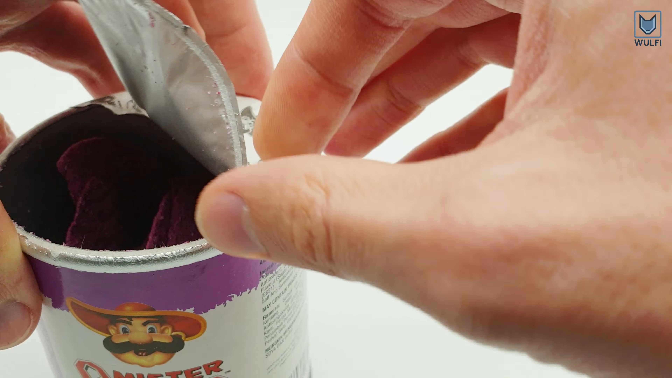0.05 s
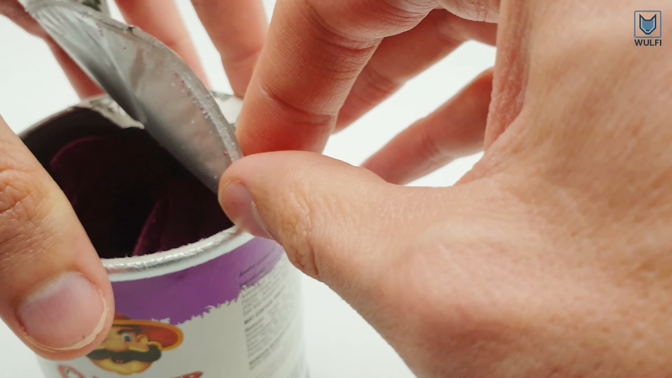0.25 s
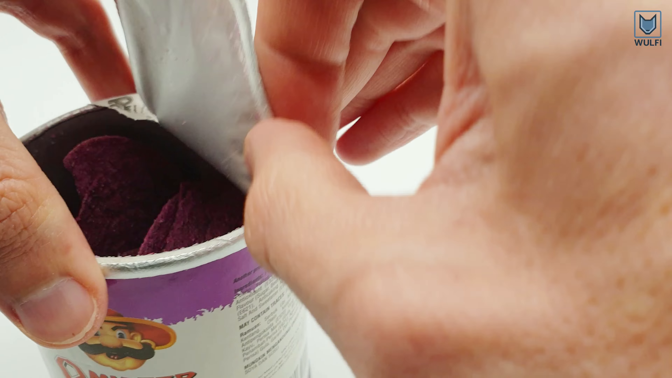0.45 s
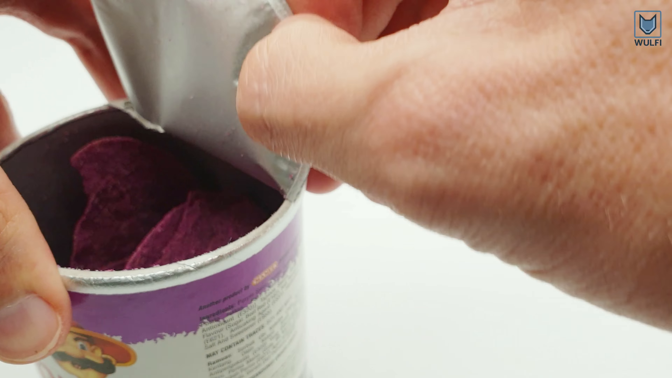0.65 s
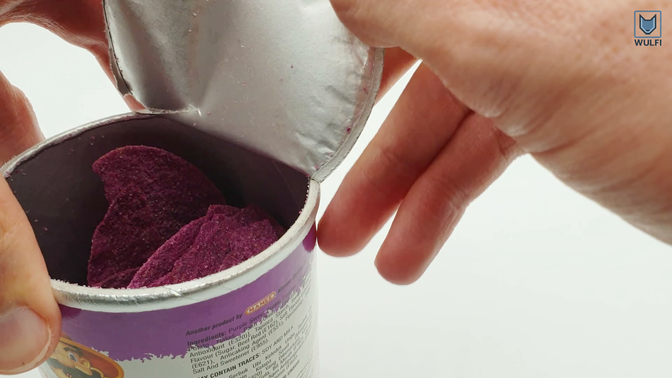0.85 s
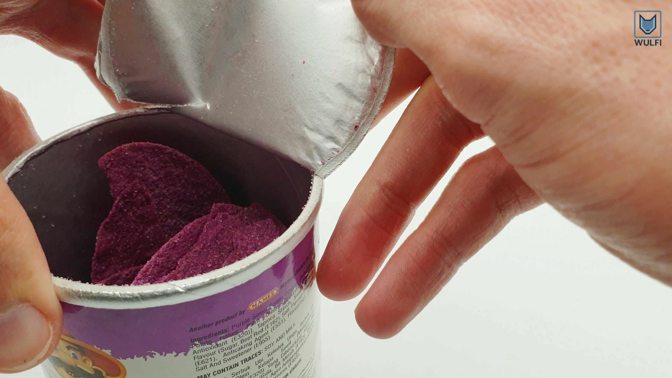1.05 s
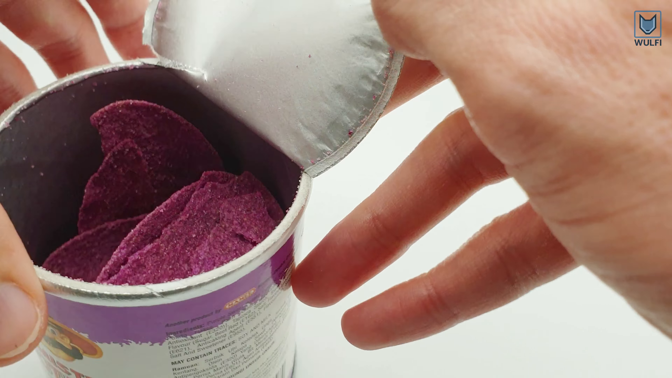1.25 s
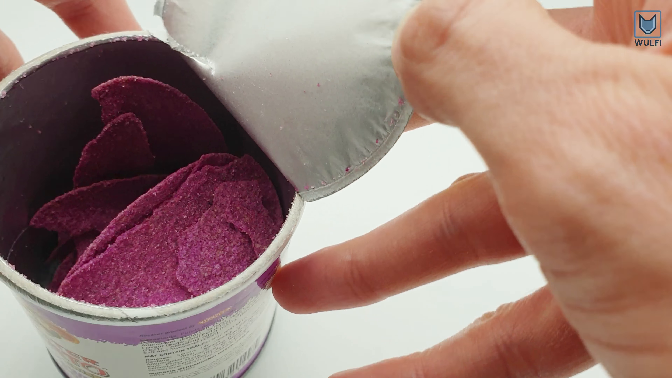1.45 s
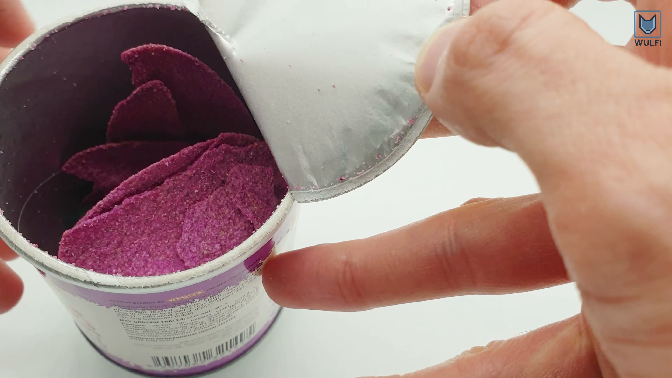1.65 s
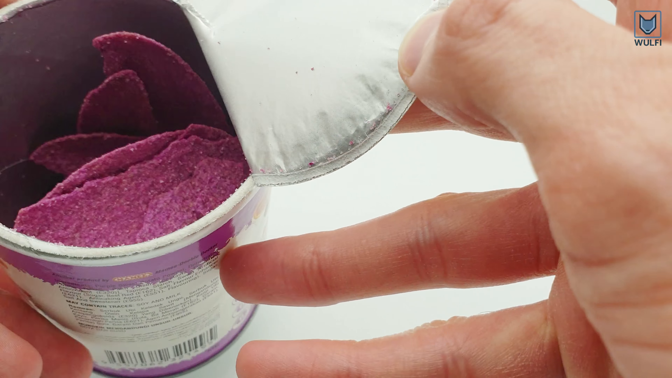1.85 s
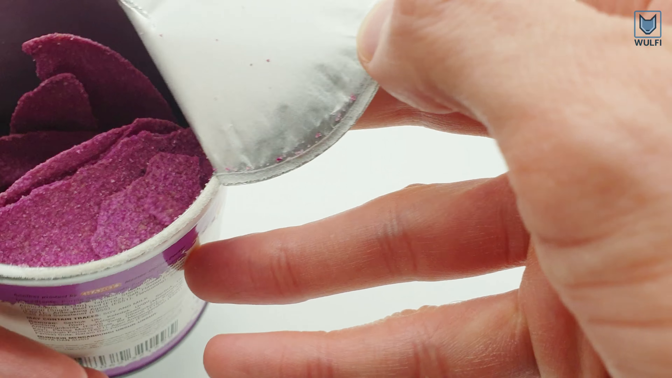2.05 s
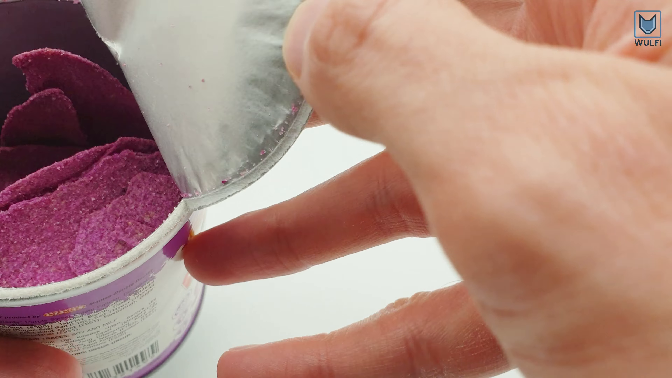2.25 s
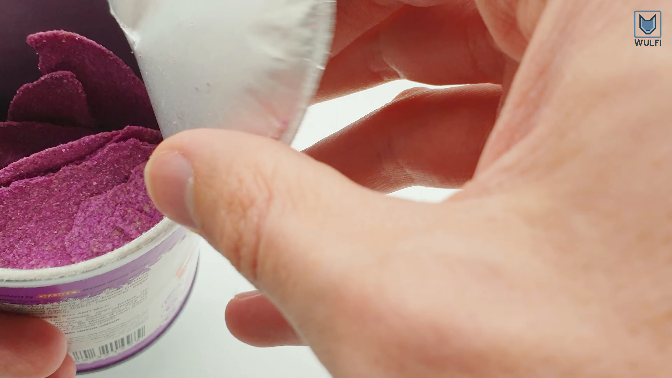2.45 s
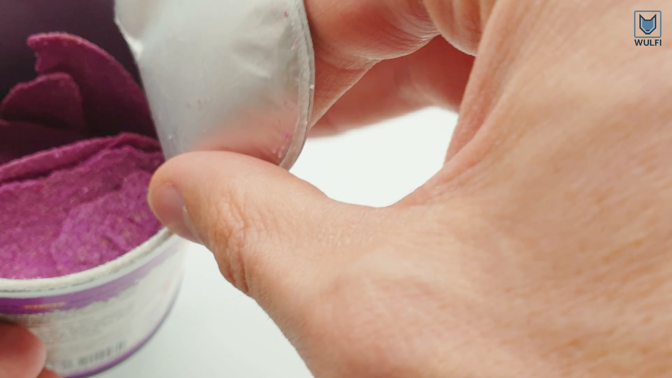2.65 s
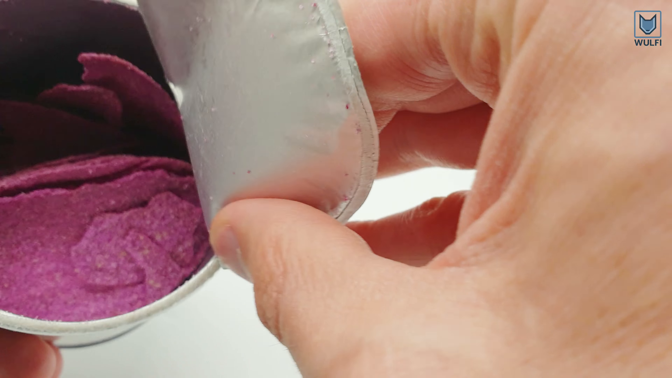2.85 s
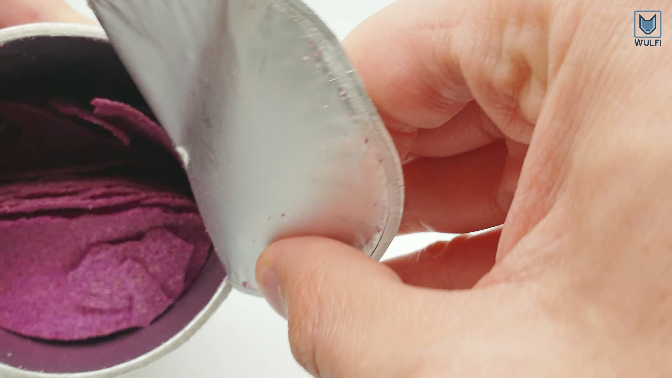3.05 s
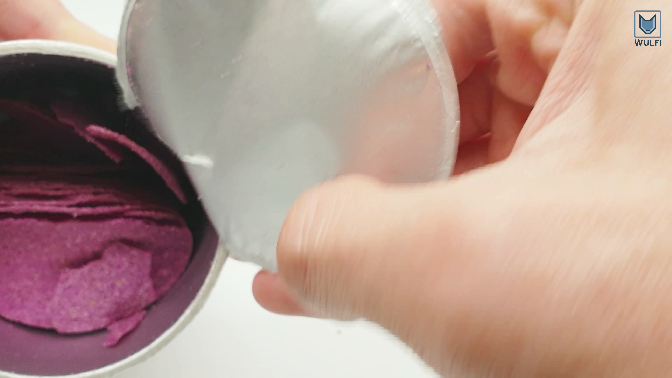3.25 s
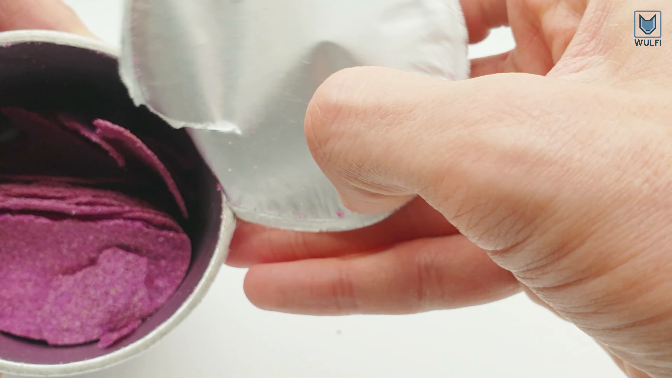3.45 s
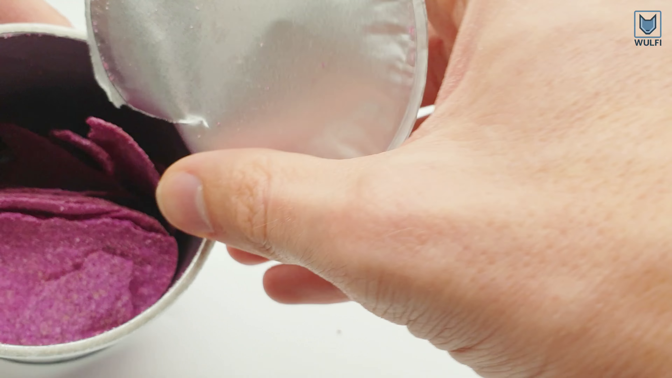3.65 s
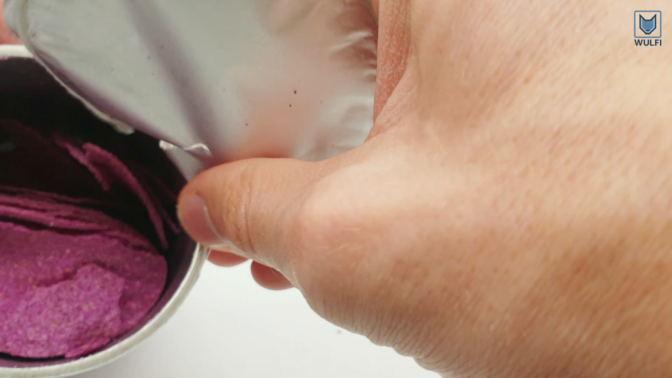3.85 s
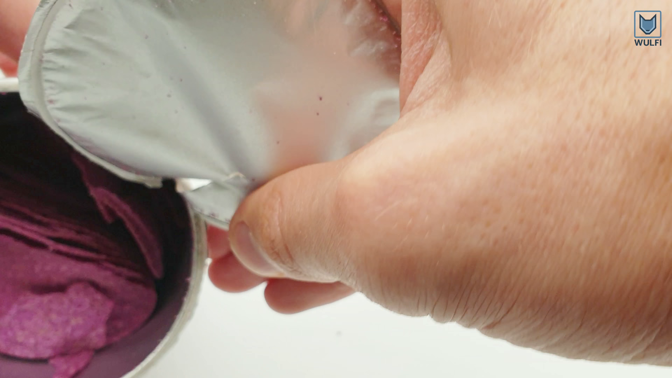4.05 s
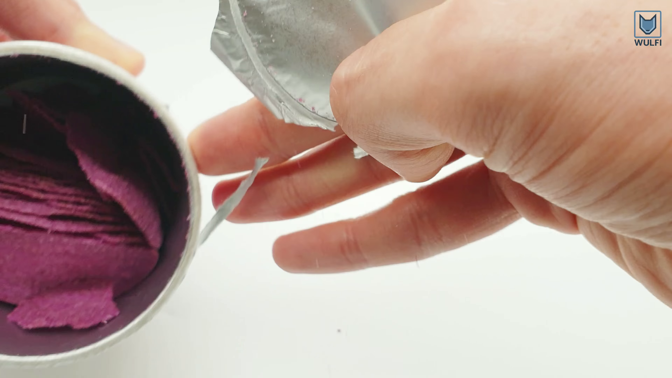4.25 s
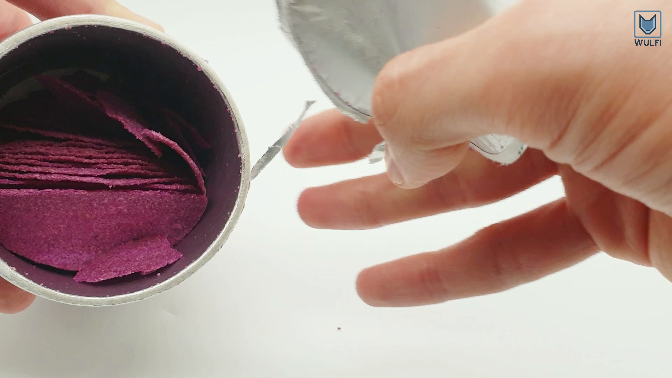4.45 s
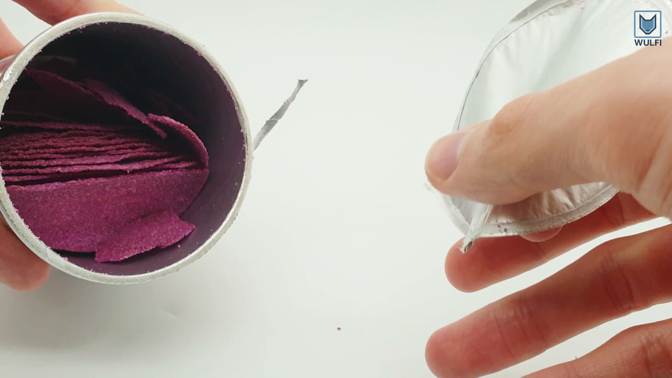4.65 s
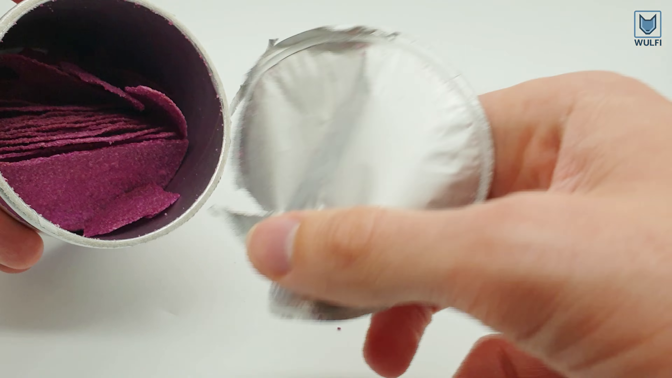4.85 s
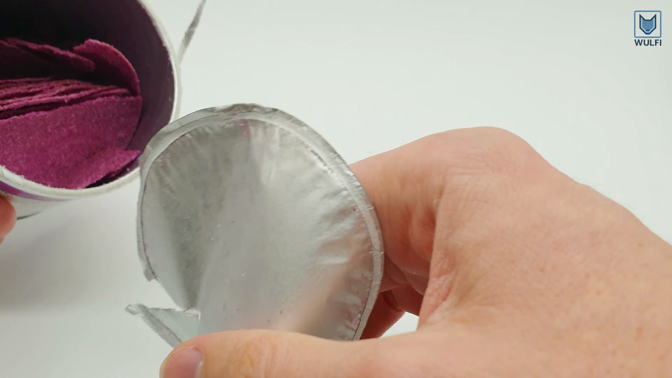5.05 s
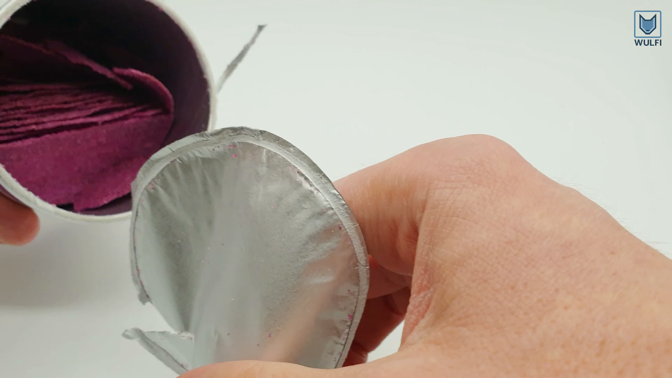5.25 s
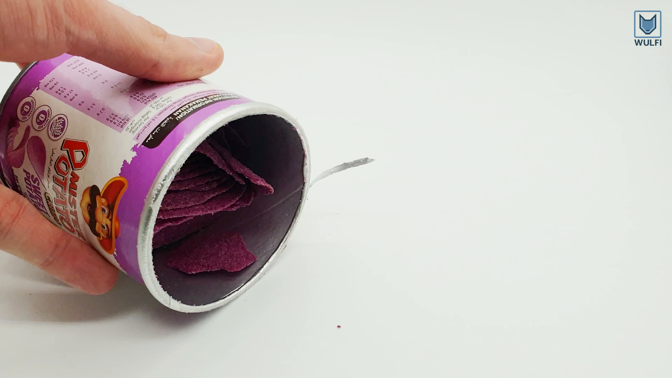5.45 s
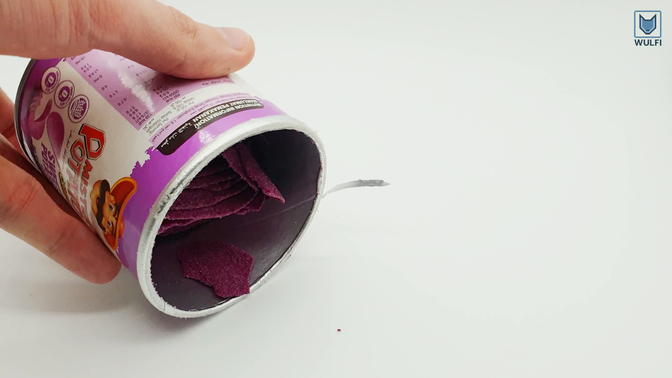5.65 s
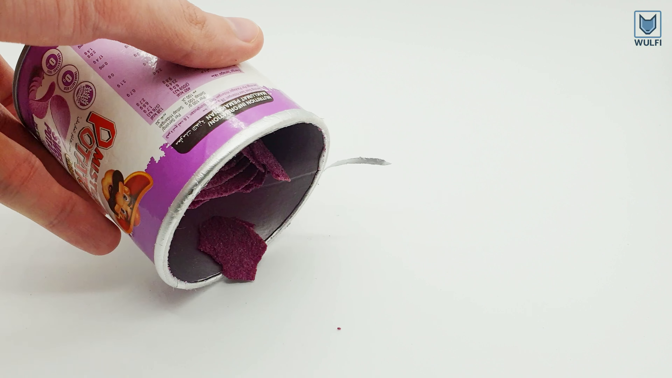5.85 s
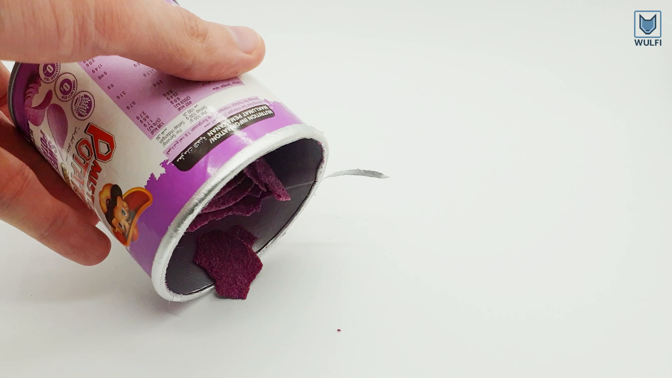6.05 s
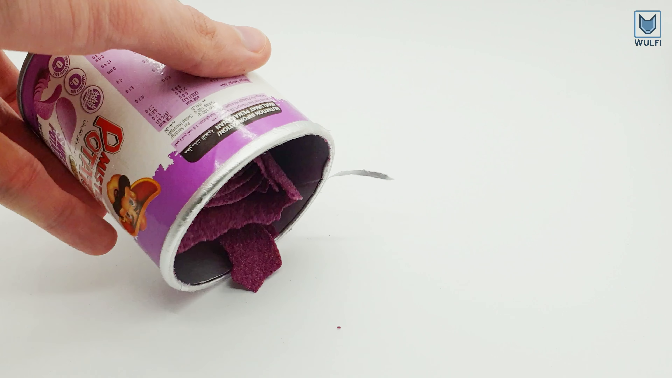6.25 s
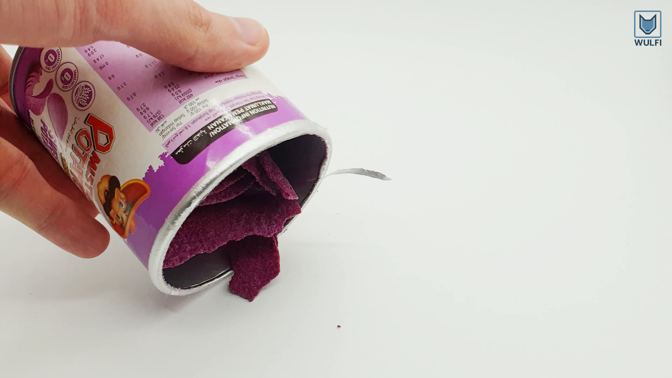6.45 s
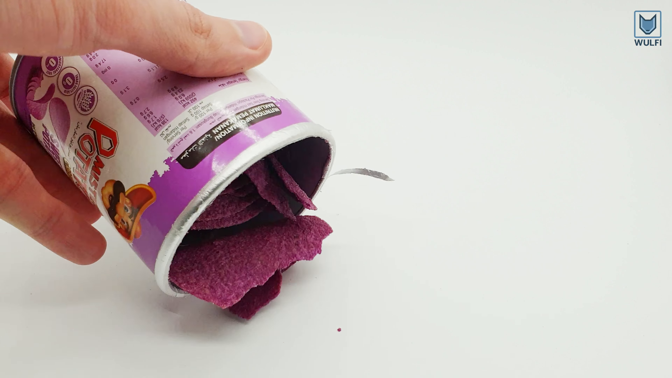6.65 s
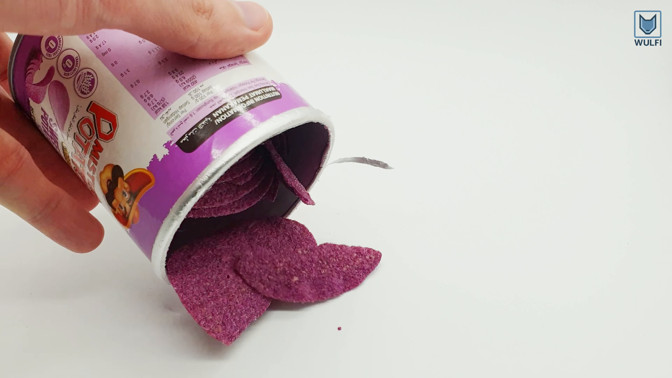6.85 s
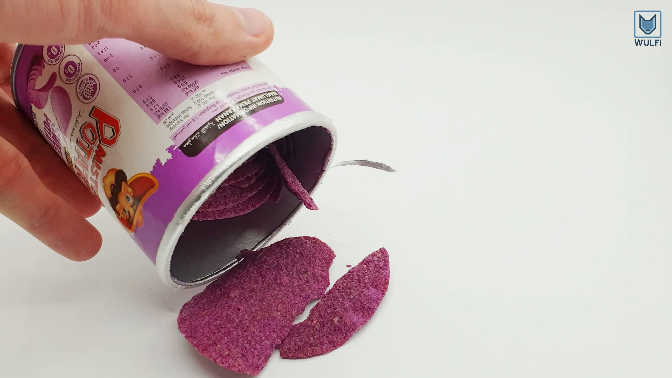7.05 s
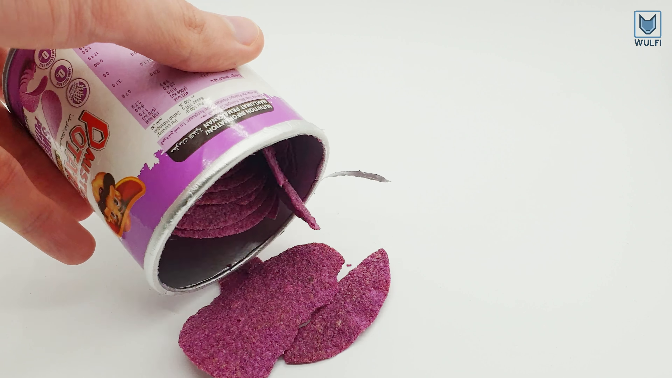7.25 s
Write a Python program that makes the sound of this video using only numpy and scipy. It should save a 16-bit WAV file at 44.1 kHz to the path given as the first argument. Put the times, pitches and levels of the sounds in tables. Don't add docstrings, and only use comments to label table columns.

```python
import sys
import numpy as np
from scipy import signal
from scipy.fft import rfft, irfft, next_fast_len
from scipy.io import wavfile
from scipy.ndimage import uniform_filter1d, map_coordinates

SR = 44100
rng = np.random.default_rng(int(sys.argv[2]) if len(sys.argv) > 2 else 0)


def file_out(sig):
    cols = np.atleast_2d(sig).T
    lim = np.clip(cols, -1, 1)
    pcm = np.round(lim * 32767).astype(np.int16)
    wavfile.write(sys.argv[1], SR, pcm)


def invert_db(level):
    return 10 ** (np.asarray(level, dtype=float) / 20)


N = 322371

# t/s, length/s, first level/dB
FLEXES = [
    (4.536, 0.071, -51),
    (4.657, 0.075, -49.5),
    (4.778, 0.043, -64),
    (4.834, 0.035, -56.5),
]
# t/s, peak/dB, f/Hz
CRACKS = [(0.5476, -17, 8600), (0.6744, -24, 5730), (0.6873, -9, 8640), (0.7472, -21, 8150),
          (0.7951, -8, 4870), (0.842, -9, 4320), (0.9686, -17.5, 1820), (1.2795, -4.5, 6150),
          (1.329, -34, 1780), (1.8462, -45, 2760), (2.134, -36, 1510), (2.178, -25, 2150),
          (2.3007, -38, 1760), (2.3245, -33, 2030), (2.361, -40, 4140), (2.384, -32, 2920),
          (2.4078, -27.5, 1610), (2.5312, -38, 1770), (2.5596, -39, 1880), (2.579, -37, 1940),
          (2.6334, -26, 8120), (2.7287, -42, 9170), (2.8298, -34, 2020), (2.9362, -14, 8770),
          (3.074, -10, 7880), (3.1552, -40, 6920), (3.1985, -33.5, 2330), (3.2271, -16, 8040),
          (3.3551, -13.5, 2890), (3.3704, -11, 8050), (3.487, -24, 5120), (3.5017, -22, 6390),
          (3.5633, -18, 3500), (3.711, -30.5, 6000), (3.7683, -31.5, 8330), (3.8452, -27, 4260),
          (3.9505, -8, 8190), (4.0633, -14.5, 9210), (4.076, -11, 8890), (4.1809, -32.5, 8500),
          (4.2363, -2.5, 4410), (4.3776, -26, 1550), (4.3944, -31, 7920), (4.4162, -23, 3140)]
# t/s, peak/dB, f/Hz
CLICKS = [(5.4076, -40, 3620), (5.4413, -13.5, 4000), (5.4789, -23.5, 3950), (5.498, -24, 8630),
          (5.5253, -27, 7710), (5.5954, -37, 3780), (5.6111, -35, 11300), (5.6236, -28, 4970),
          (5.6914, -38, 7640), (5.8301, -36, 8210), (5.9594, -37, 5060), (6.0462, -42, 3830),
          (6.1489, -37, 4230), (6.2134, -27, 7730), (6.27, -26, 11400), (6.384, -30, 3500),
          (6.4074, -24, 5060), (6.5594, -35, 8230), (6.6364, -29, 4850), (6.6516, -14, 9210),
          (6.6762, -15, 3950), (6.6762, -12, 4070), (6.693, -8, 3830), (6.8244, -26, 5120),
          (6.8788, -24, 5080), (6.9002, -26, 10300), (6.9054, -29, 3900), (6.9366, -20.5, 4260),
          (6.9681, -17.5, 3850), (7.0459, -38, 4140), (7.1003, -14.5, 4220), (7.211, -34, 3590),
          (7.2394, -33, 4020), (7.289, -31, 11000)]
FLEX_DB = 1
LOUD_DB = -40
CLICK_DELAY_S = .0009
TICK_S, TICK_DB = 0.013, -16


def unit(x):
    return x / np.sqrt(np.mean(x ** 2) + 1e-20)


def along(points, hz):
    f, v = np.transpose(points)
    return np.interp(np.log(hz + 1), np.log(f + 1), v)


def curves(rows):
    s, *cols = np.transpose(rows)
    t = np.arange(N) / SR
    return np.array([np.interp(t, s, c, left=-150, right=-150) for c in cols])


def wobble(rate):
    return map_coordinates(rng.standard_normal(int(N * rate / SR) + 4), [np.arange(N) * rate / SR])


def filtered(x, response):
    m = 2 * next_fast_len(N // 2 + 4096)
    gain = response(np.fft.rfftfreq(m, 1 / SR))
    gain = gain / np.sqrt(np.mean(np.abs(gain) ** 2))
    return irfft(rfft(x, m) * gain, m)[..., :N]


def resonant(modes):
    def response(f):
        power = sum(np.abs(invert_db(db) * f * w / (c * c - f * f + 1j * f * w)) ** 2 for c, w, db in modes)
        cepstrum = irfft(np.log(power + 1e-9) / 2)
        half = len(cepstrum) // 2
        folded = np.r_[cepstrum[0], 2 * cepstrum[1:half], np.zeros(len(cepstrum) - half)]
        return np.exp(rfft(folded))
    return response


def quiet():
    # f/Hz, level/dB per Hz
    floor = [(22, -7), (107, -6), (281, -20), (450, -34.5), (2600, -40), (8480, -35), (14800, -38),
             (16500, -51.5)]
    # f/Hz, correlation/1
    likeness = [(60, 1), (380, 0.54), (2380, -0.01), (15000, 0.34)]
    hum_db, sway_db = -63.5, 2

    def mid_side(hz):
        turn = np.arccos(np.clip(along(likeness, hz), -1, 1)) / 2
        return invert_db(along(floor, hz)) * [np.cos(turn), np.sin(turn)]

    mid, side = filtered(rng.standard_normal((2, N)), mid_side)
    air = invert_db(-64.0 + sway_db * wobble(5.5)) * unit(np.array([mid + side, mid - side]))
    phase = 2 * np.pi * np.cumsum(99.3 + 1.6 * wobble(15.0)) / SR
    hum = np.sqrt(2) * invert_db(hum_db + 3.1 * wobble(18)) * np.sin(phase)
    return air + hum * invert_db([[-.8], [.8]])


def grit(alike, grain_db, lag):
    cracks = rng.standard_normal((2, N))
    place = np.repeat(rng.standard_normal(N // 1500 + 1), 1500)[:N]
    late = np.clip(np.arange(N) + np.round(lag * place).astype(int), 0, N - 1)
    right = alike * cracks[0, late] + np.sqrt(1 - min(alike, 1) ** 2) * cracks[1]
    clumps = invert_db(grain_db * (wobble(700) + 0.62 * wobble(150)))
    return unit(clumps * np.array([cracks[0], right]))


def patchy(x, depth_db):
    z = signal.stft(x, nperseg=256)[2]
    field = uniform_filter1d(rng.standard_normal(z.shape[1:]), size=2, axis=0)
    field = uniform_filter1d(field, size=9, axis=1)
    patched = signal.istft(z * invert_db(depth_db * unit(field)), nperseg=256)[1][:, :N]
    return patched * invert_db(-depth_db ** 2 / 13.0)


def bursts(strokes, rise_s, stop_s, spread_db):
    bend = 0.91
    env = np.zeros((3, 2, N + SR))
    pans_db = spread_db * rng.standard_normal((len(strokes), 1))
    for (s, length, db, change_db, mid_db, tube_db), pan_db in zip(strokes, pans_db):
        t = np.arange(round((length + 2 * stop_s) * SR)) / SR
        slope_db = change_db * np.minimum(t / length, 1) ** (bend if change_db < 0 else 1)
        slope_db = slope_db - 60 * np.maximum(t - length, 0) / stop_s
        front = 1 + 0.37 * (change_db < 0) * np.exp(-t / 0.00049)
        shape = (1 - np.exp(-t / rise_s)) * front * invert_db(slope_db)
        layers = invert_db(db + np.array([0, mid_db, tube_db]))[:, None] * invert_db(pan_db * [1, -1])
        start = round(s * SR)
        env[:, :, start:start + len(t)] += (layers[..., None] * shape) ** 2
    return env[..., :N]


def chatter(rate, depth_db, life_s):
    breaks = (rng.random(N) < rate / SR) * invert_db(depth_db * rng.standard_normal(N))
    flare = np.exp(-np.arange(SR // 20) / SR / life_s)
    gain = 1 + signal.fftconvolve(breaks, flare)[:N] * invert_db(depth_db)
    return np.abs(gain) / np.mean(gain)


def crackle(cracks, bed, env, hiss, sheet, air, burst_db, thump_db, tube_pan_db, mouth_hz):
    # f/Hz, width/Hz, level/dB
    rumble = [(58.5, 70, 1), (192, 36, 3), (277, 84, -4)]
    fine, coarse, dull = cracks
    bed = invert_db(curves(bed) + np.array([[1.8], [3], [3.4], [3.4]]) * wobble(25))
    drive = np.sqrt(bed[:3, None] ** 2 + env * invert_db(np.array(burst_db))[:, None, None] ** 2)

    def tube(f):
        mouth = (1j * f / (mouth_hz + 1j * f)) ** 2
        return resonant(air)(f) * mouth

    bright = filtered(drive[0] * fine, lambda f: invert_db(along(hiss, f)))
    middle = filtered(drive[1] * np.roll(fine, SR // 60, axis=1), resonant(sheet))
    hollow = filtered(drive[2] * coarse, tube) * invert_db([[tube_pan_db], [-tube_pan_db]])
    shove = np.sqrt(bed[3] ** 2 + env[2] * invert_db(thump_db) ** 2)
    return bright + middle + hollow + filtered(shove * dull, resonant(rumble))


def foil(cracks):
    # t/s, length/s, last level/dB, tube re hiss/dB
    creaks = [(0.0, 0.043, -45.5, 8.5), (.174, 0.022, -39.5, 4), (.89, 0.02, -28, -4),
              (1.233, 0.053, -35, 0), (2.115, 0.054, -43, -3.5), (2.383, 0.019, -42.5, 0.5),
              (2.506, 0.03, -51, -19), (2.68, 0.05, -53, -28), (2.812, 0.025, -43.5, -9),
              (3.751, 0.015, -43, -6), (3.825, 0.027, -35.5, -2), (4.157, 0.07, -46.5, -10)]
    # t/s, length/s, level/dB, tube re hiss/dB
    rips = [
        (.545, 0.082, -33, -6),
        (.668, .05, -34, -8),
        (1.012, 0.21, -50, 1.5),
        (2.54, 0.125, -55, -8),
        (2.935, 0.087, -35, -18.5),
    ]
    # t/s, length/s, first level/dB, tube re hiss/dB
    tears = [(.194, 0.048, -50, 4), (.421, 0.098, -53.5, 5), (.631, 0.053, -39.5, -20),
             (.674, 0.065, -33, -6), (.774, 0.027, -25.5, -12), (.836, 0.084, -31.5, -8.5),
             (1.299, 0.057, -59, 11.5), (2.201, 0.096, -52, -3.5), (3.021, .05, -39, -16),
             (3.121, 0.19, -53, 2), (3.209, 0.039, -31, -12.5), (3.227, 0.027, -26.5, -9),
             (3.34, 0.011, -32, -12), (3.355, 0.01, -18, -11.5), (3.55, .012, -48, -6),
             (3.404, 0.059, -47.5, 3.5), (3.528, 0.027, -64, 13.5), (3.563, 0.058, -35.5, -5.5),
             (3.767, 0.048, -40, -11), (3.891, 0.023, -44, -7), (3.933, 0.014, -34, -9),
             (4.065, 0.007, -29.5, -8), (4.105, .012, -30.5, -4), (4.258, 0.02, -25.5, 3.5)]
    # t/s, length/s, first level/dB, tube re hiss/dB
    snaps = [(.042, 0.029, -36, -3.5), (.216, 0.059, -40.5, -1), (.402, 0.023, -26.5, -7.5),
             (.746, 0.046, -29.5, -15), (.794, 0.073, -22.5, -6), (.91, 0.067, -23, -3),
             (.968, 0.019, -23.5, -22), (1.279, 0.0074, -20.5, -8), (2.177, 0.03, -35, -23),
             (2.321, 0.1, -46.5, -8), (2.408, 0.085, -45, 0), (2.634, 0.085, -42, -5),
             (2.836, 0.26, -50.5, -4.5), (3.073, 0.053, -35, -17), (3.259, 0.056, -31.5, -10.5),
             (3.304, 0.027, -33.5, -9), (3.326, 0.03, -31, -10), (3.37, 0.028, -17, -16),
             (3.486, 0.026, -29, -6.5), (3.504, 0.012, -17.5, -18), (3.622, 0.043, -29.5, -2),
             (3.728, 0.021, -31.5, -6), (3.849, 0.036, -31.5, -6), (3.921, 0.025, -35, -21.5),
             (3.949, 0.042, -14.5, -13.5), (4.077, 0.048, -19.5, -13.5), (4.119, 0.039, -28, -29),
             (4.235, 0.041, -12.5, -1.5), (4.276, 0.063, -19.5, -8), (4.378, 0.042, -34, -8.5),
             (4.394, 0.043, -34.5, -11.5), (4.412, 0.088, -40, -10.5), (.687, .03, -29, -13),
             (1.3263, 0.012, -43, 5)]
    # t/s, peak/dB, sheet re peak/dB, tube re peak/dB
    lone_ticks = [(0.3593, -42.5, 3, -2), (.379, -36.5, -3, -5), (1.184, -37, -5, -9),
                  (1.726, -56, 13.5, -20), (1.75, -57, 13.5, -22), (1.785, -52, 10.5, -18),
                  (1.87, -45, 7.5, 4), (2.244, -46.5, 2, 14), (2.301, -50.5, 9, 12), (2.428, -42, 10, 13),
                  (2.464, -46, 0, 0), (2.533, -41, -3, 7.5), (2.562, -49, -5, 7), (2.579, -38, -4, 5),
                  (2.618, -33.5, -7, -13), (2.66, -43.5, 7, 8), (2.7292, -35, -20, -26)]
    # t/s, effort/dB
    handling = [(0, -65.5), (.3, -63.5), (.8, -51), (1.36, -53.5), (1.4, -64.5), (1.62, -80), (1.8, -70),
                (2.02, -75.5), (2.6, -65), (2.8, -72.5), (3.65, -62), (4.5, -57.5), (4.53, -71.5),
                (4.62, -62), (4.72, -63), (4.77, -80), (5.0, -84), (5.2, -105), (5.42, -90)]
    # f/Hz, level/dB per Hz
    glue_hiss = [(2530, -19), (4300, -2), (6300, -4.5), (8700, -1.5), (12100, -2.5), (14900, -10.5),
                 (15900, -10), (16500, -45.5)]
    # f/Hz, width/Hz, level/dB
    foil_modes = [(1090, 260, -6.5), (1755, 430, -2.5), (2467, 480, -2), (2980, 250, -1), (3480, 890, -2),
                  (4350, 140, -1.5)]
    # f/Hz, width/Hz, level/dB
    upright_air = [(419.6, 160, -0.5), (611, 66, 3), (698, 35, -8.5)]
    creak_db, rip_db, tear_db, snap_db = 13.5, 1, -8, -23
    sheet_db, sheet_thins = -4, 0.077
    rip_sheet_db = -5
    loose_sheet_db, loose_tube_db = -16, -36
    effort_db = -66
    # level at that effort, dB per dB of effort
    rub_db, rub_grows = [-60.5, -66.5, -71, -73], [0.19, 0.68, 1.2, 0.86]
    hush_s, hush_db = 4.74, -12

    rub = []
    for s, db in handling:
        levels = np.add(rub_db, np.multiply(rub_grows, db - effort_db))
        rub.append((s, *(levels + [hush_db * (s > hush_s), 0, 0, 0])))
    pulls = []
    for rows, change_db in [(creaks, creak_db), (rips, rip_db), (tears, tear_db), (snaps, snap_db)]:
        for s, length, db, tube_db in rows:
            mid_db = sheet_db - sheet_thins * (db - LOUD_DB) + rip_sheet_db * (rows is rips)
            pulls.append((s, length, db - max(change_db, 0), change_db, mid_db, tube_db))
    pulls += [(s, length, db, FLEX_DB, loose_sheet_db, loose_tube_db) for s, length, db in FLEXES]
    ticks = [(s, TICK_S, db - 7.5, TICK_DB, mid_db, tube_db) for s, db, mid_db, tube_db in lone_ticks]
    ticks += [(s + CLICK_DELAY_S, TICK_S / 2, db - 15.5, TICK_DB, -6, -25) for s, db, hz in CRACKS]
    strokes = bursts(pulls, 0.0007, 0.051, 0.96) * chatter(82, 1.9, 0.00074)
    strokes = strokes + bursts(ticks, 0.0005, 0.032, 0.79)
    return crackle(cracks, rub, strokes, glue_hiss, foil_modes, upright_air,
                   burst_db=[.3, -.8, -4.5], thump_db=-11.5, tube_pan_db=-.9, mouth_hz=330)


def pops(events, cycles, gain_db, pan_db, late=4):
    out = np.zeros((2, N + SR))
    t = np.arange(SR // 10) / SR
    for (s, db, hz), (lag, detune) in zip(events, rng.standard_normal((len(events), 2))):
        pair = np.sin(2 * np.pi * hz * t)
        pair = pair + 0.21 * np.sin(2 * np.pi * hz * (0.99 + 0.091 * detune) * t)
        ring = invert_db(db + gain_db - 60 * t * hz / cycles) * (1 - np.exp(-t * hz / 1.1)) * pair
        out[0, round(s * SR):][:len(t)] += invert_db(pan_db) * ring
        out[1, round(s * SR + late * abs(lag)):][:len(t)] += invert_db(-pan_db) * ring
    return out[:, :N]


def dents():
    # t/s, peak/dB, f/Hz
    low_pops = [(.041, -31.5, 674), (.162, -40, 660), (.187, -28, 637), (.215, -44, 640), (0.402, -29, 610),
                (1.866, -53, 606), (2.131, -44, 695), (2.429, -44, 330), (2.579, -51, 224),
                (2.659, -52.5, 257), (3.355, -25, 359), (3.615, -34, 487), (3.732, -32, 363),
                (3.951, -25, 637), (4.238, -11, 560), (4.461, -38.5, 680), (5.255, -57.5, 636),
                (5.466, -34, 700), (5.793, -21.5, 740), (5.905, -26, 720), (6.41, -25, 740),
                (6.88, -37, 610), (6.69, -34.5, 202), (6.91, -36, 297), (7.048, -35, 261),
                (7.101, -36.5, 216), (6.975, -26, 830), (7.065, -22, 597), (7.14, -27, 700),
                (6.073, -24.5, 710), (6.203, -20, 730), (6.296, -14, 765), (6.474, -29, 717),
                (6.646, -22.5, 577), (6.684, -17, 710), (6.907, -23.5, 1080), (7.29, -24, 696)]
    # t/s, peak/dB, f/Hz
    high_pops = [(0.403, -22.5, 2350), (.404, -27, 1870), (.404, -27, 3100), (.188, -34, 2200),
                 (0.048, -37.5, 1900), (1.3263, -35, 1700), (2.178, -35, 2150), (2.41, -34, 1900),
                 (2.535, -40, 1770), (2.3, -42, 1900), (2.831, -33.5, 2050), (3.357, -14, 2700),
                 (3.2116, -25.5, 2280), (4.2762, -14, 3770), (6.2, -22, 2556), (7.047, -26, 1560),
                 (7.07, -29, 3100), (6.29, -28, 1300), (5.795, -30, 1500), (4.238, -14, 3000)]
    return pops(low_pops, 22, 0.65, -2.2) + pops(high_pops, 53, -0.6, .2, late=1.5)


def edge_clicks():
    clicks = pops(np.add(CLICKS, [CLICK_DELAY_S, 0, 0]), 6.3, 2.1, -.4, late=.7)
    clicks = clicks + pops(np.add(CRACKS, [CLICK_DELAY_S, 0, 0]), 9, 1.4, -.2, late=2.1)
    return signal.sosfilt(signal.butter(2, 1400, "high", fs=SR, output="sos"), clicks)


def lid(cracks):
    # f/Hz, width/Hz, level/dB
    lid_modes = [(3170, 810, 5.5), (4920, 1000, -3.5)]
    # f/Hz, width/Hz, level/dB
    fan_modes = [(490, 300, -2), (920, 280, -1.5), (1320, 300, -1.5)]
    # t/s, level/dB
    waft = [
        (4.58, -80),
        (4.595, -62),
        (4.66, -54),
        (4.73, -64),
        (4.76, -84),
    ]
    lid_db = -7.5
    moves = [(s, length, db, FLEX_DB, lid_db, 0) for s, length, db in FLEXES]
    env = np.sqrt(bursts(moves, 0.0048, 0.042, 0.88))
    rustle = filtered(env[1] * cracks[0], lambda f: resonant(lid_modes)(f) ** 2)
    puff = filtered(invert_db(curves(waft)) * cracks[0], lambda f: resonant(fan_modes)(f) ** 2)
    return rustle + puff


def crisps(cracks):
    # t/s, length/s, last level/dB, scrape re hiss/dB
    slips = [(5.385, 0.027, -55, -6), (5.763, 0.033, -46.5, 15), (6.03, 0.041, -47.5, -1),
             (6.11, 0.033, -48.5, 0), (6.17, 0.032, -35.5, 3), (6.256, 0.038, -33, 1.5),
             (6.33, 0.075, -33, 2), (6.6, 0.037, -41.5, 1), (6.664, 0.022, -20, 0.6),
             (6.898, 0.011, -37.5, 6.5), (7.272, .019, -53, 10)]
    # t/s, length/s, first level/dB, scrape re hiss/dB
    scrapes = [(5.408, 0.033, -48.5, 3.5), (5.547, 0.089, -49.5, 2.5), (5.623, 0.085, -50.5, 4.5),
               (5.717, 0.057, -48, 3.5), (5.833, 0.068, -41.5, 2), (6.147, .05, -41.5, 4),
               (6.226, 0.032, -42.5, -3), (6.312, .04, -46.5, 0), (6.555, 0.022, -45, -1),
               (6.501, 0.098, -50, 5.5), (6.64, 0.047, -30.5, -1.5), (6.751, 0.11, -39, 3),
               (6.914, 0.01, -40.5, 7), (6.934, 0.09, -44.5, 8), (7.058, 0.055, -34.5, 4.5),
               (7.126, 0.015, -36.5, 8.5), (7.291, 0.024, -38.5, 6)]
    # t/s, length/s, first level/dB, scrape re hiss/dB
    knocks = [(5.442, 0.033, -38, 3), (5.458, 0.09, -39, 4), (5.521, 0.015, -32, -11),
              (5.793, 0.053, -44.5, 9), (5.903, 0.065, -40.5, 3.5), (6.074, 0.035, -39.5, 10),
              (6.204, 0.045, -34, -3), (6.298, 0.014, -36, 9.5), (6.405, 0.076, -34, -0.5),
              (6.473, 0.064, -44, 0.5), (6.69, 0.069, -21, 3.5), (6.878, 0.024, -31.5, 1),
              (6.968, 0.051, -31.5, 3.5), (7.046, 0.016, -35.5, 13.5), (7.1, 0.033, -27, -1),
              (7.146, 0.072, -55, 14), (7.212, 0.029, -53, 16), (7.232, 0.028, -44.5, 11.5)]
    # t/s, peak/dB
    crumbs = [(5.5635, -34), (5.623, -26), (5.6787, -45), (5.7254, -44), (5.8294, -26), (5.902, -36),
              (6.1703, -21), (6.4394, -33), (6.8236, -26), (6.9894, -31), (7.0785, -24)]
    # f/Hz, level/dB per Hz
    crumb_hiss = [(2530, -9), (4300, -2.5), (5720, -4), (11000, -0.5), (14900, -12.5), (15600, -35),
                  (15900, -38)]
    # f/Hz, width/Hz, level/dB
    wall_modes = [(1060, 200, -3), (1570, 60, 2), (2190, 80, 2), (2900, 70, -1), (2400, 3000, -8),
                  (3740, 70, -3), (4060, 90, -4), (5100, 150, -5)]
    # f/Hz, width/Hz, level/dB
    tipped_air = [(567, 77, 6.5), (740, 41, 4), (917, 34, -6.5)]
    slide_db = [-61.5, -58.5, -62, -75]
    still_db = -80
    tip_s, start_s = 5.4, 0.034
    steeper_db = [1.5, 4, 6, 21]
    slip_db, scrape_change_db, knock_db = 14, -5, -20.5
    boom_db, boom_thins = -0.5, 0.126

    slide = [(tip_s, *np.full(len(slide_db), still_db)),
             (tip_s + start_s, *slide_db),
             (N / SR, *np.add(slide_db, steeper_db))]
    moves = []
    for rows, change_db in [(slips, slip_db), (scrapes, scrape_change_db), (knocks, knock_db)]:
        for s, length, db, scrape_db in rows:
            tube_db = boom_db - boom_thins * (db - LOUD_DB)
            moves.append((s, length, db - max(change_db, 0), change_db, scrape_db, tube_db))
    ticks = [(s, TICK_S, db - 17, TICK_DB, -1.5, -4) for s, db in crumbs]
    ticks += [(s + CLICK_DELAY_S, TICK_S, db - 13.5, TICK_DB, -4, -25) for s, db, hz in CLICKS]
    strokes = bursts(moves, 0.00225, 0.07, 1.2) * chatter(160, 2.9, 0.0016)
    strokes = strokes + bursts(ticks, 0.00044, .015, 1.0)
    return crackle(cracks, slide, strokes, crumb_hiss, wall_modes, tipped_air,
                   burst_db=[.3, -.3, -.8], thump_db=-30, tube_pan_db=-1.6, mouth_hz=480)


def room(x):
    # f/Hz, t60/s
    decay = [(300, 0.24), (2000, 0.24), (12000, 0.28)]
    hz, t, z = signal.stft(rng.standard_normal((2, SR // 2)), SR, nperseg=256)
    tail = signal.istft(z * invert_db(-60 * t / along(decay, hz)[:, None]), SR, nperseg=256)[1]
    delayed = np.pad(x, ((0, 0), (250, 0)))
    return signal.fftconvolve(delayed, tail / np.linalg.norm(tail[0]), axes=1)[:, :N]


def scene():
    fine = patchy(grit(0.55, 0.46, lag=13), 2)
    coarse = grit(0.91, 2.65, lag=4.3)
    dull = grit(0.98, 0.64, lag=3.9)
    cracks = fine, coarse, dull
    near = foil(cracks) + dents() + edge_clicks() + lid(cracks) + crisps(cracks)
    return near + invert_db(-17.5) * room(near) + quiet()


def roll_off(x):
    return signal.sosfilt(signal.butter(12, 16630, fs=SR, output="sos"), x)


def record(dry):
    ceiling = 1.1
    low_cut = signal.butter(3, 46, "high", fs=SR, output="sos")
    top_cut = signal.cheby2(12, 30, 15750, fs=SR, output="sos")
    held = ceiling * np.tanh(dry / ceiling)
    return roll_off(signal.sosfilt(np.r_[low_cut, top_cut], held))


dry = scene()
out = record(dry)
file_out(out)
```